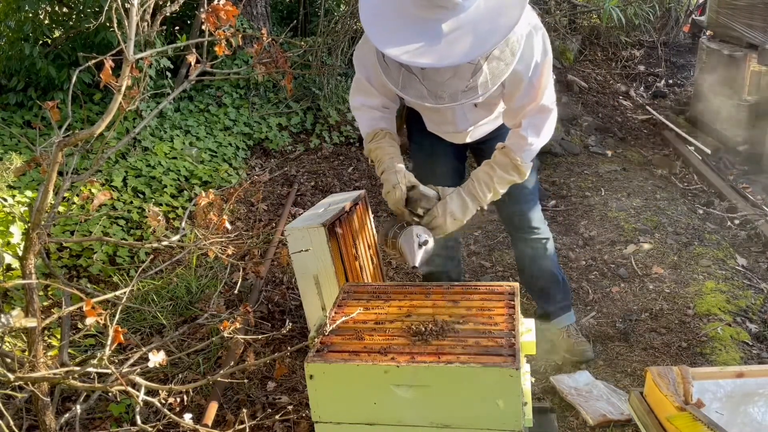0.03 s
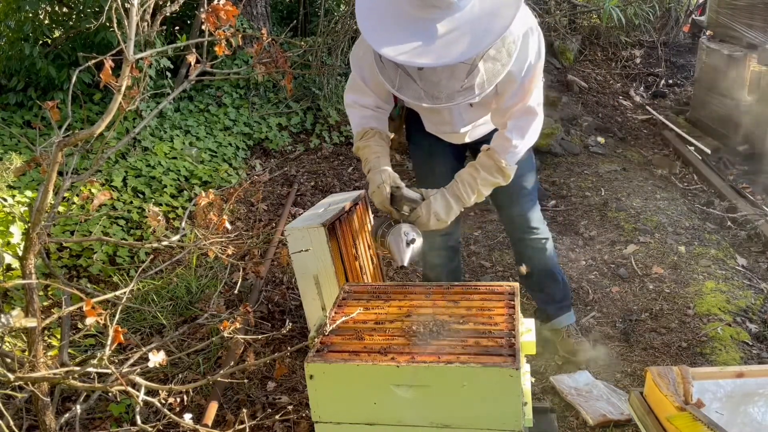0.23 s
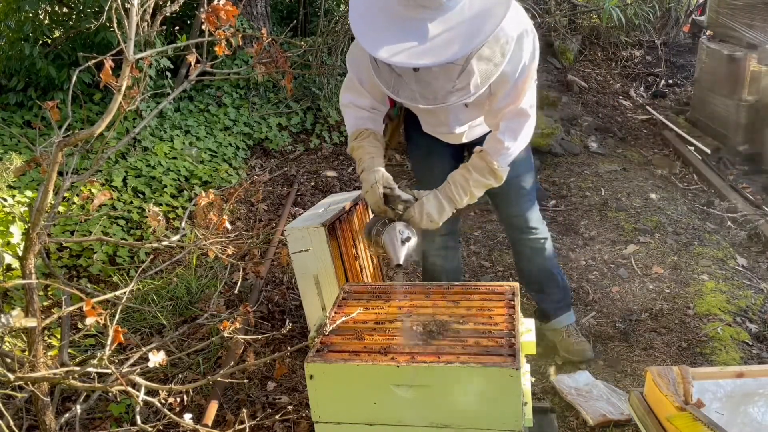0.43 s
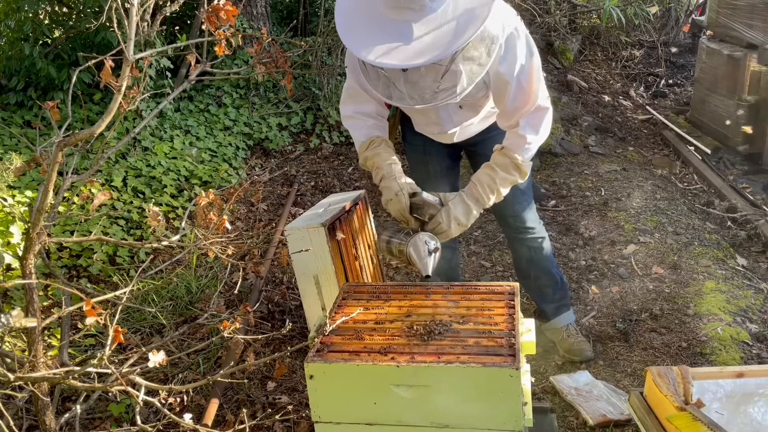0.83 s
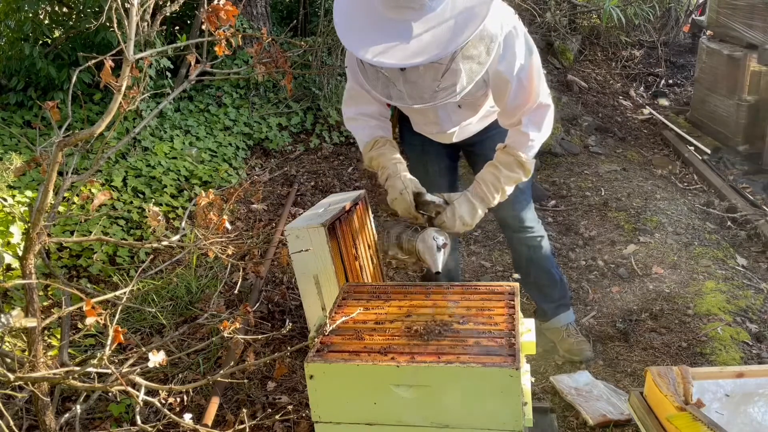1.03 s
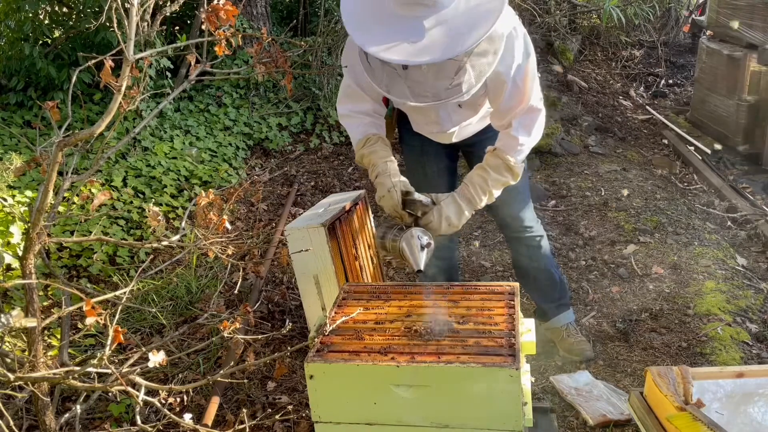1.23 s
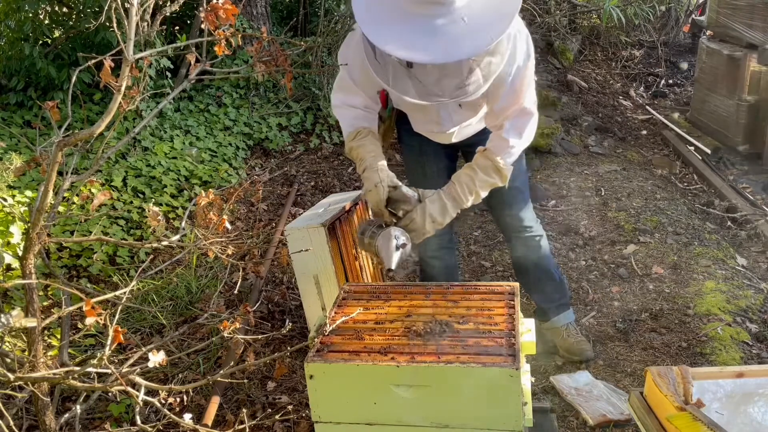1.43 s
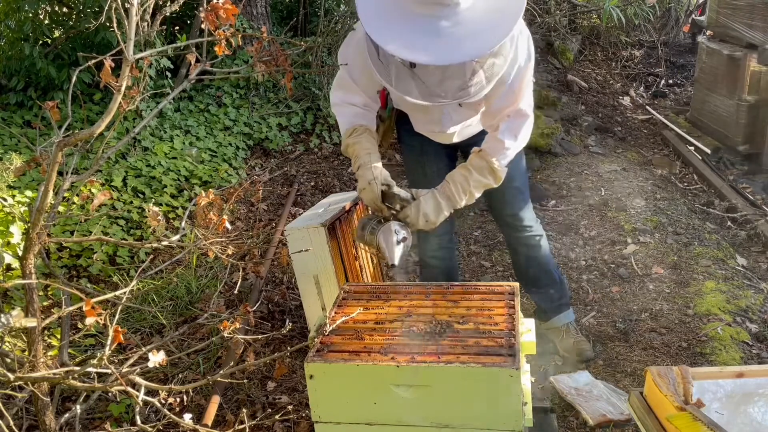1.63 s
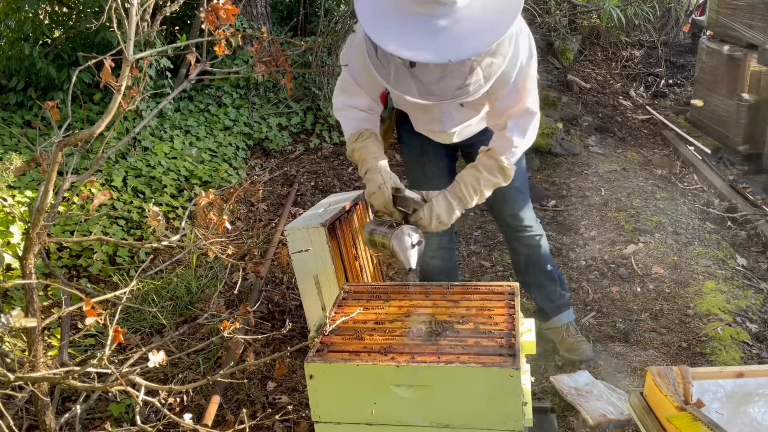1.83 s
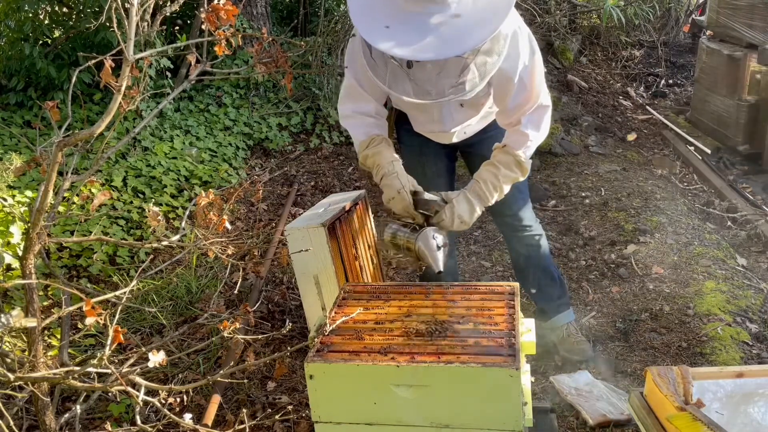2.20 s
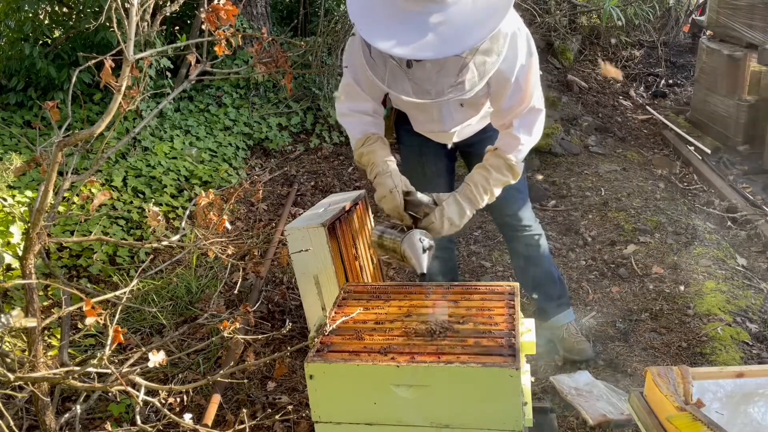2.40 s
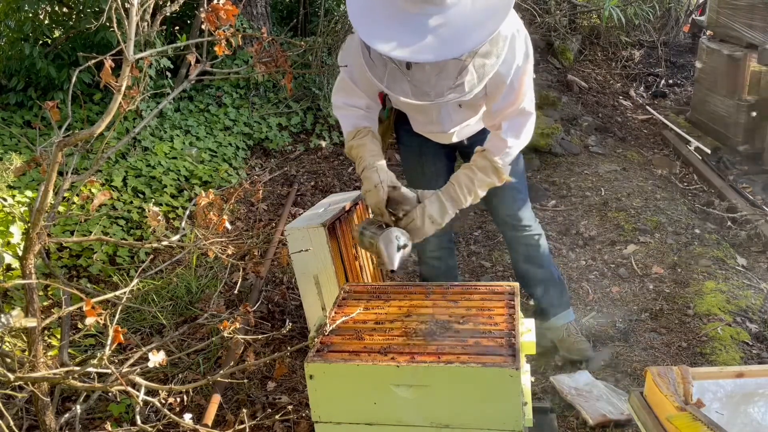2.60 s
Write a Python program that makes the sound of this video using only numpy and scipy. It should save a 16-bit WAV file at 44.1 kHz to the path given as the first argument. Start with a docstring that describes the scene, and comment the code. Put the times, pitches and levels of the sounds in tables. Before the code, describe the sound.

A bee smoker puffing steadily in short breathy bursts outdoors, with faint bee hum.

```python
"""Breathy puffs, about three and a half a second: a bee smoker pumped over an open hive in a garden.
Each squeeze drives a turbulent jet through the can and nozzle while the bellows' cloth flaps and creases;
between squeezes the bellows suck air back in. The smoker throws a short, faint echo.
Bees hum faintly over quiet outdoor air, a soft rustle and a low drone."""
import sys
import numpy as np
from scipy import signal
from scipy.fft import rfft, irfft
from scipy.io import wavfile

SR = 44100
rng = np.random.default_rng(int(sys.argv[2]) if len(sys.argv) > 2 else 0)


def inscribe(sig):
    """Save sig as 16-bit PCM at rate SR to the path in sys.argv[1].

    A 1-D sig is mono; a 2-D sig holds one channel per row.
    Samples are clipped to [-1, 1] before scaling.
    """
    pcm = np.round(np.clip(np.atleast_2d(sig).T, -1, 1) * 32767)
    wavfile.write(sys.argv[1], SR, pcm.astype(np.int16))


N = 121275
TIME = np.arange(N) / SR


def puffs():
    """The jet rings the can, the bellows chuff below it and the nozzle hisses above, all with the flow."""
    # squeezes of the bellows: crest t/s, rise/s, fall/s, jet level/dB, chuff level/dB, hiss level/dB
    squeezes = [(-.02, .026, 0.016, -46.5, -44, -59.5), (0.232, 0.028, 0.034, -44, -45, -62.5),
                (0.515, 0.028, 0.027, -43.5, -43, -63.5), (.779, 0.026, 0.025, -45, -42.5, -63.5),
                (1.061, 0.027, 0.037, -48, -49, -66), (1.371, 0.022, 0.029, -42.5, -42.5, -61.5),
                (1.654, 0.018, 0.031, -46.5, -44, -65.5), (1.946, 0.024, 0.036, -45.5, -43.5, -64.5),
                (2.236, .019, 0.042, -46, -47.5, -65.5), (2.56, .028, 0.025, -44.5, -45, -63)]
    # noise colours of the three layers: f/Hz, level/dB
    jet_colour = [(100, -53), (300, -15.5), (480, -4), (560, 0), (640, 1), (715, -15), (790, -1.5),
                  (870, -4), (950, 1.5), (1060, -1), (1300, 0), (1480, -4), (1850, -3), (2200, -13),
                  (2650, -18.5), (3200, -23.5), (4200, -49), (8000, -43), (16000, -68)]
    chuff_colour = [(25, -31), (75, -11), (110, -17), (140, -20), (200, -7.5), (260, -1), (320, -1),
                    (420, -3.5), (520, -11), (700, -17), (2000, -53), (16000, -70)]
    hiss_colour = [(300, -6.5), (2000, 5.5), (3500, -1.5), (5000, -2.5), (7500, -3), (10500, -6.5),
                   (13000, -11.5), (16000, -12.5)]
    # resonances of the can and of the nozzle: f/Hz, width/Hz, lift/dB
    can_resonances = [(595, 75, 1.5), (953, 22, 3), (945, 18, 4.5), (1008, 46, 5.5), (1148, 17, 13),
                      (1187, 31, 4.5), (1630, 58, -3.5), (1724, 50, -2), (2373, 110, 3.5), (2564, 48, 8),
                      (2940, 60, 2)]
    nozzle_resonances = [(3680, 210, 7), (4440, 200, 3.5), (5450, 400, 3.5), (6320, 170, 2),
                         (7300, 400, 1.5), (10630, 250, 4)]
    jet_power, chuff_power, hiss_power = 1.617, 1.24, 0.96  # exponents on the flow: higher is tighter
    chuff_lag_s = 0.00086
    jet, chuff, hiss = np.zeros((3, N))
    for crest, rise, fall, jet_db, chuff_db, hiss_db in squeezes:
        jet += amp(jet_db) * stroke(crest, rise, fall) ** jet_power
        chuff += amp(chuff_db) * stroke(crest + chuff_lag_s, rise, fall) ** chuff_power
        hiss += amp(hiss_db) * stroke(crest, rise, fall, roundness=2.58) ** hiss_power
    turbulence_db = 0.5 * wander(rate_hz=117)
    body = jet * noise(jet_colour, can_resonances) + chuff * noise(chuff_colour)
    top = hiss * noise(hiss_colour, nozzle_resonances)
    return amp(turbulence_db) * body + amp(0.5 * turbulence_db) * top


def cloth():
    """The bellows' skin flaps taut in short low thuds, and its folds creak."""
    # flaps of the cloth: peak t/s, level/dB, f/Hz
    flaps = [(0.241, -39, 271), (.259, -41, 320), (0.523, -33, 324), (.54, -34.5, 325), (.547, -35.5, 278),
             (0.761, -35, 279.7), (.808, -41, 260), (1.091, -42.5, 252.5), (1.1, -36, 299.2),
             (1.365, -36, 340), (1.661, -37.5, 320.1), (1.962, -42.5, 286), (1.983, -40, 230.9),
             (2.233, -35, 259.4), (2.282, -45, 324), (2.295, -42, 330), (2.565, -33, 349)]
    # creaks of the folds: start t/s, level/dB
    creaks = [(.529, -50), (.567, -56.5), (0.811, -59), (.819, -51), (1.691, -67), (1.708, -56.5),
              (1.984, -48)]
    # noise colour of a creak: f/Hz, level/dB
    creak_colour = [(100, -6), (700, 8), (1200, 7), (2500, -1.5), (3200, -6), (4200, -11), (6000, -21),
                    (16000, -30)]
    thuds = np.zeros(N)
    for crest, db, hz in flaps:
        tone = np.sin(2 * np.pi * (hz * TIME + rng.random()))
        thuds += amp(db) * stroke(crest, rise_s=0.0023, fall_s=0.0031) * tone
    creak_envelope = sum(amp(db) * knock(start, attack_s=0.0014) for start, db in creaks)
    return thuds + creak_envelope * noise(creak_colour)


def intakes():
    """The bellows spring open, drawing air softly through the inlet while the unfolding cloth rasps."""
    # in-breaths and cloth rasps: crest t/s, rise and fall/s, level/dB
    breaths = [(0.128, 0.018, -64.5), (0.401, 0.048, -65.5), (0.677, 0.029, -66), (0.953, 0.03, -66),
               (1.238, 0.036, -64), (1.536, 0.028, -67), (1.831, 0.025, -66), (2.122, .034, -64.5),
               (2.422, 0.026, -62.5), (2.729, 0.016, -59.5)]
    rasps = [(0.133, 0.01, -69), (0.4, 0.014, -66), (.67, 0.018, -71), (.945, 0.024, -68),
             (1.248, 0.017, -67.5), (1.524, 0.009, -69.5), (1.818, 0.0059, -66), (2.412, 0.013, -64),
             (2.73, .012, -69)]
    # their noise colours: f/Hz, level/dB
    breath_colour = [(40, -25), (150, -6), (280, -0.5), (460, 5.5), (700, -13.5), (1050, -4.5), (1900, -9),
                     (2600, -20.5), (4000, -25.5), (8000, -31.5), (16000, -44)]
    rasp_colour = [(200, -10), (800, 3), (1300, -1.5), (2000, 1.5), (2800, -4.5), (4000, -18.5),
                   (7000, -18.5), (16000, -37)]
    flow = sum(amp(db) * stroke(crest, swell, swell) for crest, swell, db in breaths)
    rub = sum(amp(db) * stroke(crest, swell, swell) for crest, swell, db in rasps)
    breath = grainy_noise(breath_colour, depth_db=2, rate_hz=160)
    rasp = grainy_noise(rasp_colour, depth_db=3, rate_hz=260)
    return flow * breath + rub * rasp


def echo(source):
    """A short faint scatter from the hive, ground and shrubs."""
    level_db, t60_s, predelay_s = -28, 0.18, 0.006
    t = TIME[:SR // 2]
    tail = rng.standard_normal(len(t)) * amp(-60 * t / t60_s) * (t > predelay_s)
    return amp(level_db) * signal.fftconvolve(source, tail / np.linalg.norm(tail))[:N]


def bees():
    """Three bees, each a wingbeat buzz that drifts in pitch and loudness."""
    # one row a bee: wingbeat f/Hz, level/dB
    wingbeats = [(222, -79), (206.6, -79), (232.5, -88.5)]
    harmonics_db = [-7.5, -1.5, -10, -13.5, -15.5, -22, -12, -8]
    hum = np.zeros(N)
    for hz, db in wingbeats:
        pitch_hz = hz * (1 + 0.041 * wander(rate_hz=4.66))
        phase = 2 * np.pi * np.cumsum(pitch_hz) / SR
        buzz = sum(amp(level) * np.sin(k * phase) for k, level in enumerate(harmonics_db, 1))
        waver_db = 1.8 * wander(rate_hz=9.7)
        hum += amp(db) * unit(buzz * amp(waver_db))
    return hum


def garden():
    """The bed: quiet outdoor air, a soft mid-range rustle and a distant, wavering low drone."""
    # noise colours of the air and the rustle: f/Hz, level/dB
    air_colour = [(20, 13), (55, 3), (130, -6.5), (280, -15.5), (430, -0.5), (600, -10), (1000, -1.5),
                  (1500, -18), (2500, -17), (4300, -20), (10500, -22), (15500, -23)]
    rustle_colour = [(100, -54), (450, -5.5), (700, 4.5), (1000, -10.5), (1400, -1.5), (1900, 1.5),
                     (2400, -14.5), (4000, -19), (16000, -48)]
    # swell and ebb of the rustle: t/s, level/dB
    rustle_levels = [(0, -73), (.15, -92), (.33, -68), (.62, -75.5), (.87, -94), (1.0, -72), (1.3, -72.5),
                     (1.58, -83), (1.8, -72.5), (2.15, -72.5), (2.35, -77), (2.75, -81)]
    air_db, drone_db = -71, -76.5
    drone_hz, waver_hz = 78.2, 11
    phase = 2 * np.pi * drone_hz * TIME
    drone = unit(np.sin(phase) * (1.3 + wander(waver_hz)) + np.cos(phase) * wander(waver_hz))
    rustle_db = np.interp(TIME, *np.transpose(rustle_levels))
    rustle = amp(rustle_db) * noise(rustle_colour)
    return amp(air_db) * noise(air_colour) + rustle + amp(drone_db) * drone


def amp(db):
    """Decibels to gain."""
    return 10 ** (np.asarray(db) / 20)


def unit(x):
    """Scales to rms 1."""
    return x / np.sqrt(np.mean(x ** 2) + 1e-20)


def noise(colour, resonances=()):
    """Steady noise of rms 1 in the given colour, with a peak or dip at each resonance."""
    hz = np.fft.rfftfreq(N, 1 / SR)
    colour_hz, colour_db = np.transpose(colour)
    db = np.interp(np.log(hz + 1), np.log(colour_hz), colour_db)
    for centre, width, lift in resonances:
        db += lift / (1 + (2 * (hz - centre) / width) ** 2)
    return unit(irfft(rfft(rng.standard_normal(N)) * amp(db), N))


def grainy_noise(colour, depth_db, rate_hz):
    """Coloured noise of rms 1, roughened by a fast random flutter in level."""
    return unit(noise(colour) * amp(depth_db * np.clip(wander(rate_hz), -2, 2)))


def wander(rate_hz):
    """Random drift of rms 1 that rolls off above the rate."""
    hz = np.fft.rfftfreq(N, 1 / SR)
    rolloff = np.exp(-(hz / rate_hz) ** 2) * (hz > 0)
    return unit(irfft(rfft(rng.standard_normal(N)) * rolloff, N))


def stroke(crest_s, rise_s, fall_s, roundness=1.97):
    """One swell to 1 at the crest and back; roundness 2 is a bell, more is flat-topped."""
    late = TIME - crest_s
    distance = abs(late / np.where(late < 0, rise_s, fall_s))
    return np.exp(-np.minimum(distance ** roundness / 2, 50))


def knock(start_s, attack_s):
    """Percussive envelope that reaches 1 after the attack and dies away."""
    age = np.clip((TIME - start_s) / attack_s, 0, 50)
    return age * np.exp(1 - age)


def scene():
    """The smoker, its echo, the bees and the garden, in mono."""
    smoker = puffs() + intakes() + cloth()
    return (smoker + echo(smoker) + bees() + garden())[None]


def record(dry):
    """A steep low-pass trims the very top of the treble."""
    cutoff_hz = 15700
    lowpass = signal.firwin(511, cutoff_hz, window=("kaiser", 9), fs=SR)
    return signal.oaconvolve(dry, lowpass[None], "same")


dry = scene()
out = record(dry)
inscribe(out)
```